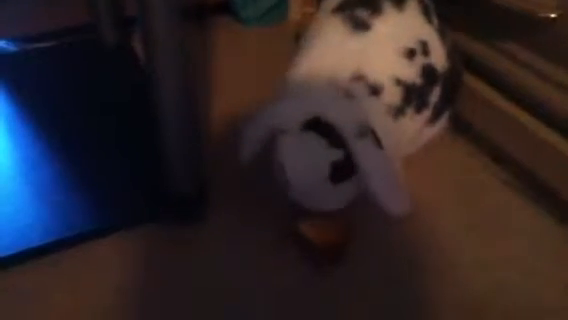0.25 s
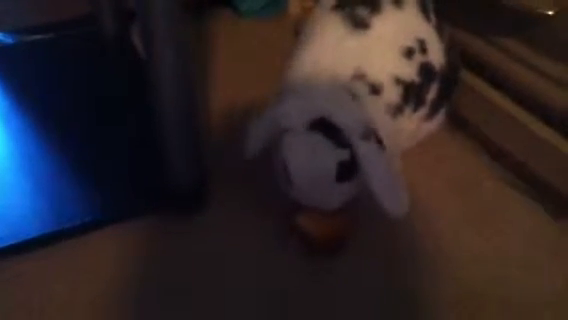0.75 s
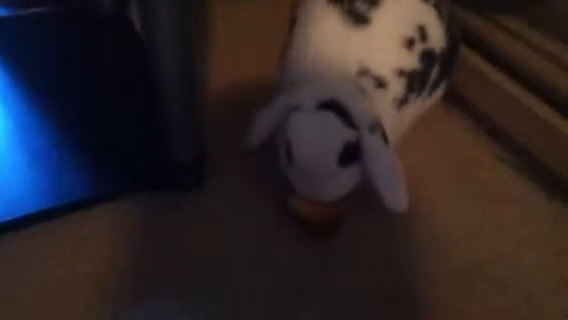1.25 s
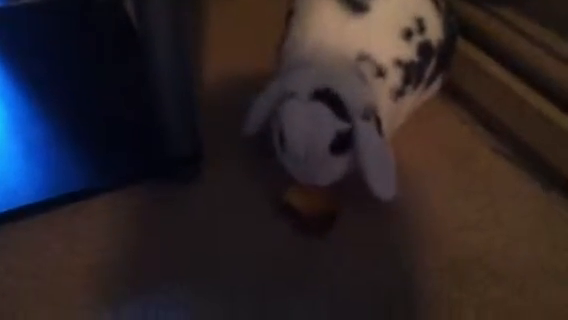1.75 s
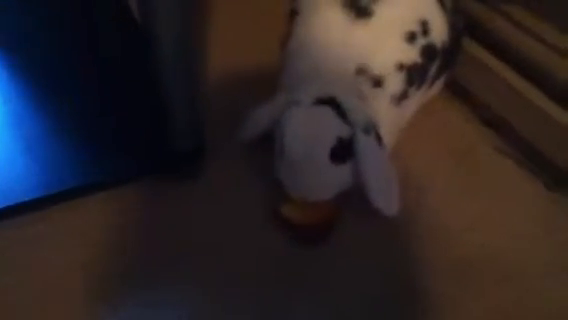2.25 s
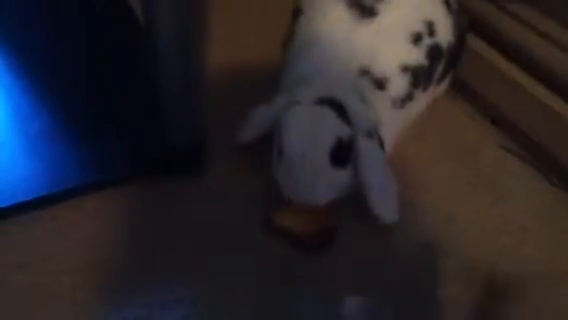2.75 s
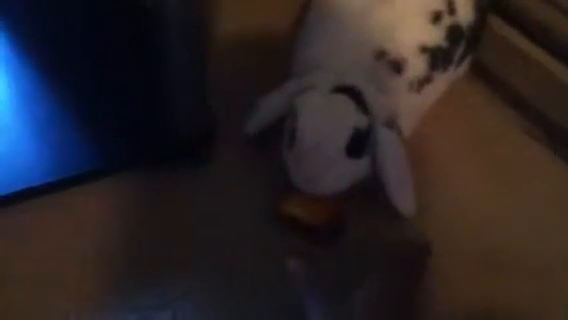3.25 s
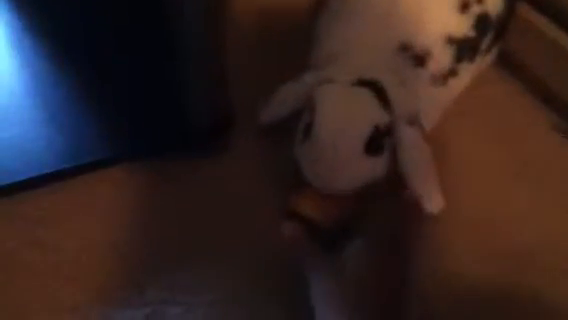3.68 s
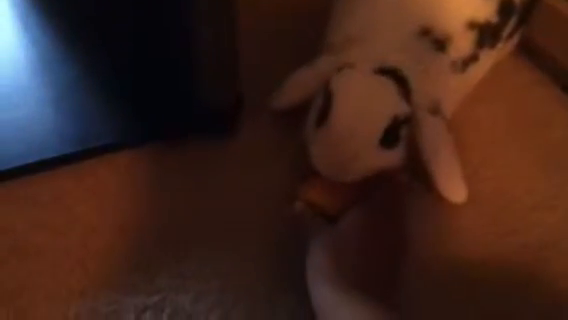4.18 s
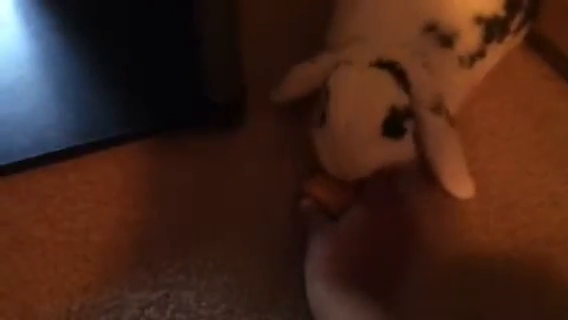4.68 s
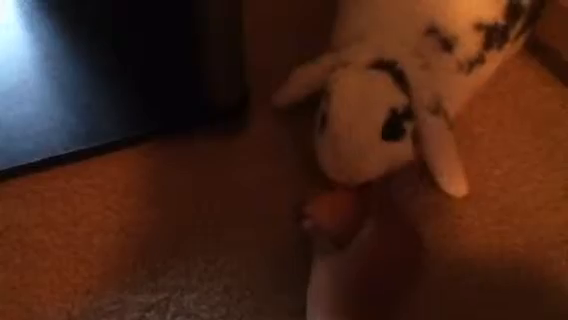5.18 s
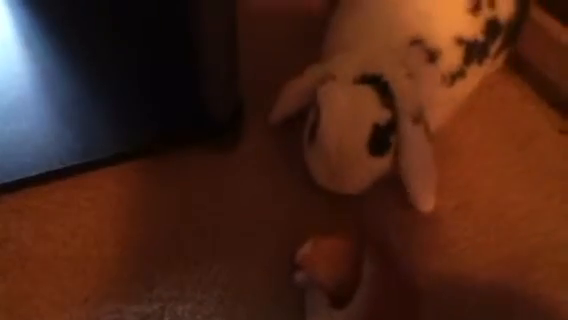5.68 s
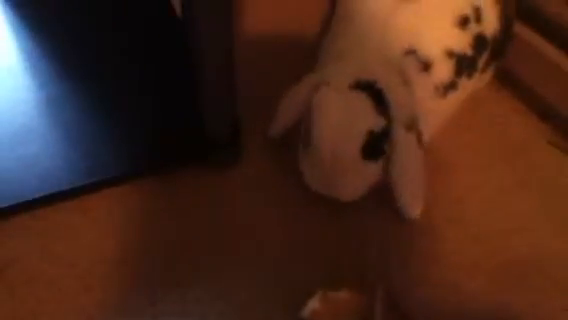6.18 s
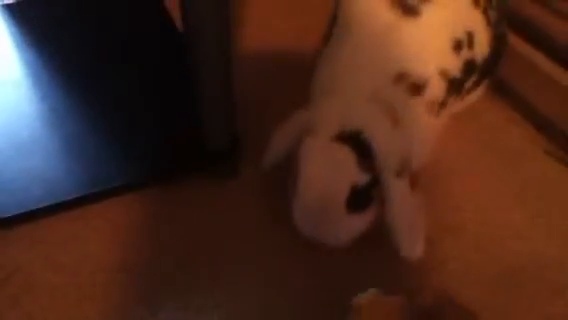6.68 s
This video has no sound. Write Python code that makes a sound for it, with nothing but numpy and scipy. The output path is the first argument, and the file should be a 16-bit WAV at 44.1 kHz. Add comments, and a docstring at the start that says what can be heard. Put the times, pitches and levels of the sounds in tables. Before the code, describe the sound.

A rabbit eats dry toast in a quiet carpeted room, close to a small microphone. At about 0.3 seconds there is a dull little knock and one soft sniff, followed by two faint chews. From 1.2 to 1.6 seconds the teeth knock on the toast and break through the crust in a first crisp crunch. After a short pause, gnawing resumes at 2.1 seconds and runs in quick, irregular clusters of brittle cracks and fine crumbling, loudest around 2.6 and 3.6 seconds. Slightly smaller bites continue until about 5 seconds, ending with a light knock. From 5.5 seconds to the end, near 7, there is only faint closed-mouth chewing with a few soft, dull taps. A low room rumble, a wavering appliance hum, microphone noise and a barely audible high electronic whine continue throughout, with a soft hiss that swells slightly after 5 seconds.

```python
"""On a carpet in a quiet room, a rabbit gnaws dry toast close to a small microphone.
Its incisors slip through the crust in short jerks: tiny cells crumble, single ones crack out loud,
and each brittle fracture is an impulse that rings the slice. Slice and teeth knock dully. The rabbit
sniffs once and chews faintly with a shut mouth, mostly after the gnawing. Underneath lie room rumble,
appliance hum, a soft hiss, microphone noise and a thin electronic whine."""
import sys
import numpy as np
from scipy import signal
from scipy.fft import rfft, irfft
from scipy.io import wavfile
from scipy.ndimage import uniform_filter1d

SR = 44100
rng = np.random.default_rng(int(sys.argv[2]) if len(sys.argv) > 2 else 0)


def generate_wav(sig):
    """Save sig (samples, or channels by samples) to the path in sys.argv[1] as 16-bit PCM at SR."""
    pcm = np.round(np.clip(np.atleast_2d(sig).T, -1, 1) * 32767).astype(np.int16)
    wavfile.write(sys.argv[1], SR, pcm)


N = 305613

# slips of the teeth through the crust: (time [s], length [s], crumbling level [dB], thick crumb [dB])
JERKS = [(1.189, .035, -58, 6), (1.384, .013, -50.5, 1), (1.408, .011, -44, 0), (1.439, .012, -39, 6),
         (1.472, .006, -37, 6), (1.505, .01, -52, -5), (1.522, .012, -62, -10), (1.568, .009, -63, 1),
         (2.101, .004, -62, 12), (2.128, .022, -56, 7), (2.321, .01, -49, 0), (2.339, .014, -40, -4),
         (2.373, .015, -44, -3), (2.508, .014, -56, 5), (2.53, .01, -34, -6), (2.549, .027, -43, 1),
         (2.587, .012, -42, 2), (2.62, .016, -40, 7), (2.655, .012, -41, 6), (2.684, .014, -40, 5),
         (2.712, .008, -55, 0), (2.727, .012, -52, 0), (2.747, .05, -60, 0), (2.814, .012, -48, 3),
         (2.83, .018, -45, -1), (2.868, .015, -48, -8), (2.912, .035, -60, -8), (3.034, .015, -55, 5),
         (3.054, .018, -49, 0), (3.086, .019, -55, -6), (3.12, .008, -53, 2), (3.161, .022, -65, -4),
         (3.222, .022, -68, -5), (3.269, .006, -54, 3), (3.277, .014, -42, 2), (3.312, .024, -43, -3),
         (3.48, .012, -66, 0), (3.517, .02, -44, 3), (3.541, .01, -39, -6), (3.556, .014, -41, -6),
         (3.579, .008, -33, 0), (3.597, .014, -44, 3), (3.633, .012, -42, -1), (3.732, .026, -51, -3),
         (3.771, .06, -66, 1), (3.851, .012, -46, -5), (3.866, .012, -34, -8), (3.884, .01, -31, -6),
         (3.905, .018, -38, 0), (3.942, .014, -41, 0), (3.979, .011, -45, 0), (4.027, .02, -55, -5),
         (4.055, .008, -56, 2), (4.08, .016, -57, 3), (4.124, .007, -50, 1), (4.138, .008, -42, 2),
         (4.166, .004, -52, 0), (4.175, .009, -41, -2), (4.2, .004, -42, 0), (4.209, .02, -60, -2),
         (4.415, .01, -43, 3), (4.432, .008, -36, -5), (4.441, .016, -55, -6), (4.466, .014, -47, -2),
         (4.484, .014, -50, -2), (4.562, .016, -62, 0), (4.602, .016, -44, 5), (4.627, .007, -38, -6),
         (4.653, .014, -48, 4), (4.685, .048, -62, 5), (4.742, .023, -55, -5), (4.827, .016, -43, 2),
         (4.852, .005, -34, -6), (4.868, .008, -42, -3), (4.903, .006, -52, -2), (4.912, .006, -42, -5),
         (4.925, .008, -56, -3), (4.949, .013, -37, -9), (4.979, .016, -36, -7), (5.003, .014, -48, 0),
         (5.024, .055, -57, -6)]
LEAD = 128  # samples by which each band's response starts ahead of the break


def amp(db):
    """Amplitude ratio of a level in decibels."""
    return 10 ** (np.asarray(db) / 20)


def unit_rms(x):
    """Normalisation to unit mean power."""
    return x / np.sqrt(np.mean(x ** 2) + 1e-20)


def spectrum_at(points, hz):
    """Interpolation of a spectrum on a log-frequency axis."""
    f, db = np.transpose(points)
    return np.interp(np.log(hz + 1), np.log(f + 1), db)


def add(mix, s, sound):
    """Superposition: a sound joins the mix at s seconds."""
    part = mix[..., round(s * SR):][..., :sound.shape[-1]]
    part += sound[..., :part.shape[-1]]


def minimum_phase(gain_db):
    """Minimum phase: the most compact causal response with these gains, given from 0 Hz to SR / 2."""
    log_gain = np.log(amp(np.maximum(gain_db, -100)))
    mirrored = np.r_[log_gain, log_gain[-2:0:-1]]
    return np.fft.ifft(np.exp(np.conj(signal.hilbert(mirrored)))).real[:1024]


def resonate(x, hz, width_hz):
    """Resonance by heterodyning: shift hz down to zero, smooth, and shift back."""
    carrier = np.exp(2j * np.pi * np.cumsum(hz * np.ones(len(x))) / SR)
    pole = np.exp(-np.pi * width_hz / SR)
    return 2 * (carrier * signal.lfilter([1 - pole], [1, -pole], x / carrier)).real


def shaped_noise(spectrum, patchy_db):
    """Spectral shaping of Gaussian noise, whose level drifts in patches of time and frequency."""
    frames, hz = N // 256 + 5, np.fft.rfftfreq(1024, 1 / SR)
    real, imag, patches = rng.standard_normal((frames, 513, 3)).T
    patches = uniform_filter1d(patches, size=10, axis=0)
    patches = unit_rms(uniform_filter1d(patches, size=12, axis=1))
    spectra = (real + 1j * imag) * amp(spectrum_at(spectrum, hz)[:, None] + patchy_db * patches)
    return unit_rms(signal.istft(spectra, nperseg=1024, noverlap=768)[1][:N])


def room_noise(level_db=-56):
    """Broadband noise floor: room rumble in the bass, microphone noise above it."""
    # noise spectrum: (frequency [Hz], relative density [dB])
    floor = [(12, -58), (20, -16), (69, -14.5), (108, -0.5), (224, -3.5), (258, -6.5), (332, -8.5),
             (634, -10.5), (1140, -19), (1350, -21), (1650, -24.5), (2120, -28), (2730, -25),
             (15200, -29.5), (16500, -48)]
    return amp(level_db) * shaped_noise(floor, patchy_db=1.07)


def appliances(whine_hz=14994, whine_db=-83):
    """Narrow-band noise is heard as a wavering hum; a pure tone is the steady electronic whine."""
    # hum bands: (frequency [Hz], level [dB], bandwidth [Hz])
    bands = [(120.3, -62.5, 11), (221.4, -64, 15.6)]
    hum = sum(amp(db) * unit_rms(resonate(rng.standard_normal(N), hz, width)) for hz, db, width in bands)
    return hum + amp(whine_db) * np.sqrt(2) * np.sin(2 * np.pi * whine_hz * np.arange(N) / SR)


def hiss():
    """Slow amplitude modulation makes a soft noise swell and fade."""
    # hiss spectrum: (frequency [Hz], relative density [dB])
    spectrum = [(450, -18), (800, -2.5), (1300, -2), (1900, 1), (2600, -4), (3500, -11), (6000, -15),
                (10000, -14), (14000, -45)]
    # envelope: (time [s], level [dB])
    swell = [(0, -70), (2.2, -68.5), (3.5, -66.5), (5, -68.5), (5.2, -62), (5.5, -63.5), (5.9, -62),
             (6.3, -64), (6.7, -62.5), (6.93, -66.5)]
    level_db = np.interp(np.arange(N) / SR, *np.transpose(swell))
    return amp(level_db) * shaped_noise(spectrum, patchy_db=2.0)


def knocks(contact_hz=2300):
    """Impacts of slice and teeth excite damped modes; the soft contact acts as a low-pass filter."""
    # impacts: (time [s], level [dB], pitch [Hz])
    impacts = [(.282, -41, 310), (.288, -35.5, 313), (1.191, -39.5, 705), (1.349, -36, 720),
               (1.388, -38, 620), (4.952, -28, 1700), (4.955, -38, 1680), (5.555, -43, 1210),
               (5.768, -39, 840), (5.773, -41, 872), (6.007, -43, 800), (6.255, -42.5, 750)]
    # modes: (frequency [multiple of pitch], relative level [dB], 60 dB decay [cycles])
    modes = [(1, -3, 13.5), (1.9, -16, 0.5), (3.4, -4, 8.5), (5.8, -3, 28)]
    out, t = np.zeros(N), np.arange(3000) / SR
    for s, db, hz in impacts:
        for multiple, mode_db, decay_cycles in modes:
            cycles = multiple * hz * t
            ring = amp(db + mode_db - 60 * cycles / decay_cycles) * np.sin(2 * np.pi * cycles)
            add(out, s, ring / (1 + (multiple * hz / contact_hz) ** 6))
    return out


def sniff():
    """Air noise in a narrow nostril passes a gliding resonance and becomes a fuzzy whistle."""
    # course of the sniff: (time [s], level [dB], whistle [Hz])
    breath = [(.295, -70, 1850), (.32, -56, 1870), (.35, -59, 1990), (.39, -65, 1830), (.43, -72, 1800)]
    s, db, hz = np.transpose(breath)
    t, out = np.arange(s[0], s[-1], 1 / SR), np.zeros(N)
    air = resonate(rng.standard_normal(len(t)), np.interp(t, s, hz), width_hz=220)
    add(out, s[0], amp(np.interp(t, s, db)) * unit_rms(air))
    return out


def toast_responses():
    """Impulse response of the slice in four bands, low to high: thick crumb, body, crust, thin flakes."""
    # colour of breaking toast: (frequency [Hz], relative density [dB])
    spectrum = [(120, -29), (220, -4.5), (500, -15.5), (720, -1), (950, -2), (1350, -0.5), (1880, 0.5),
                (2400, 0.5), (2960, -3.5), (3800, 0), (4500, -2.5), (5000, -1), (5500, -4), (6430, 1.5),
                (7700, -13), (10000, -9.5), (12100, -16), (15600, -27.5), (16500, -48)]
    # borders between the bands: (frequency [Hz])
    crossovers = [1400, 3000, 7500]
    hz = np.fft.rfftfreq(4096, 1 / SR)
    lowpasses = [1 / (1 + (hz / edge) ** 6) for edge in crossovers]
    bands = np.diff(lowpasses, axis=0, prepend=0, append=1)
    whole = rfft(minimum_phase(spectrum_at(spectrum, hz)), 4096)
    responses = np.roll(irfft(whole * bands), LEAD, axis=1)[:, :1024]
    return responses / np.linalg.norm(responses.sum(0))


def toast(force):
    """Convolution: each row of the force rings its own band of the slice."""
    return signal.oaconvolve(force, toast_responses(), axes=1)[:, LEAD:N + LEAD].sum(0)


def crumbling(strokes, rise_db_s, fall_db_s, cells_per_s, spread_db):
    """Shot noise: tiny cells give way at random while the teeth slip. One row of force for each band."""
    envelope = np.zeros((4, N))
    for s, length, db, thick_db, crust_db, thin_db in strokes:
        t = np.arange(-.02, length + .04, 1 / SR)
        slope_db = rise_db_s * np.minimum(t, 0) - fall_db_s * np.maximum(t - length, 0)
        add(envelope, s - .02, amp(db + slope_db + np.c_[[thick_db, 0, crust_db, thin_db]]))
    size = amp(spread_db * np.minimum(rng.exponential(1, N), 4)) * rng.choice([-1., 1.], N)
    breaks = rng.random(N) < cells_per_s / SR
    return envelope * unit_rms(size * breaks)


def chewing(thick_db=4, crust_db=-5, thin_db=1.5):
    """Faint shot-noise force of shut-mouth grinding; brightness trades thick crumb for thin flakes."""
    # grinding strokes: (time [s], length [s], level [dB], brightness [dB])
    chews = [(.52, .012, -62, -3), (.72, .033, -62, -6), (5.554, .005, -55, -3), (5.647, .003, -60, 9),
             (5.731, .004, -62, 2), (5.767, .01, -54, 1), (5.79, .009, -58, -6), (5.807, .006, -59, 9),
             (5.835, .008, -60, 9), (6.006, .012, -52, -2), (6.03, .025, -63, -4), (6.24, .06, -63, -8),
             (6.46, .012, -60, -3), (6.48, .012, -62, -3), (6.673, .014, -56, -4), (6.71, .041, -59, -8),
             (6.86, .006, -64, 9), (6.9, .017, -56, 0)]
    strokes = [(s, length, db, thick_db - bright_db, crust_db, thin_db + bright_db)
               for s, length, db, bright_db in chews]
    return crumbling(strokes, rise_db_s=5002, fall_db_s=1500, cells_per_s=9700, spread_db=4.5)


def coloured_jerks():
    """Spectral weighting: each jerk takes the crust and flake gains of the piece between the teeth."""
    # bites, each holding until the next: (time [s], crust [dB], thin flakes [dB])
    bites = [(1.18, 2, 0), (1.38, 3, 4), (2.09, 4, 9), (2.31, -2, 0), (2.5, 3, -2), (2.61, 4, 3),
             (2.81, 2, -1), (3.03, 3, -3), (3.26, 3, 2), (3.47, 4, 0), (3.535, -1, -11), (3.59, 3, -1),
             (3.72, -3, 0), (3.85, -3, -4), (4.11, -4, 2), (4.41, -5, -3), (4.6, -7, -4), (4.64, 1, -2),
             (4.82, -8.5, -6), (4.94, -8, -4), (5.0, 1, 8)]
    jerks, bites = np.array(JERKS), np.array(bites)
    current = np.searchsorted(bites[:, 0], jerks[:, 0] + .01) - 1
    return np.c_[jerks, bites[current, 1:]]


def gnawing():
    """Stick-slip motion: each jerk of the incisors releases a burst of crumbling force."""
    return crumbling(coloured_jerks(), rise_db_s=3800, fall_db_s=2200, cells_per_s=7400, spread_db=5.5)


def small_cracks(per_jerk=2, above_crumbling_db=14, spread_db=3):
    """Random fracture: lesser cracks fall by chance within each jerk, as (time [s], energy [dB])."""
    s, length, db, _ = np.transpose(JERKS)[..., None]
    position, size = rng.random((len(JERKS), per_jerk, 2)).transpose(2, 0, 1)
    times = s + position ** 1.5 * length
    energy_db = db + above_crumbling_db - spread_db * np.log(.1 + size)
    return list(zip(times.ravel(), energy_db.ravel()))


def cracking(dulling=0.18, pivot_db=0.5, depth_spread_db=2.5):
    """Brittle fracture of single cells: a force impulse, then splinters dying within milliseconds."""
    # the loudest cracks: (time [s], released energy [dB])
    loud_cracks = [(1.2047, -26), (1.3501, -30), (1.4078, -13), (1.4123, -10), (1.418, -11.5), (1.439, -9),
                   (1.4434, -4.5), (1.4502, -11), (1.47, -16), (1.4748, -6), (1.4857, -19), (1.5067, -24),
                   (1.5214, -21.5), (2.139, -23), (2.3242, -17), (2.341, -13.5), (2.3487, -15),
                   (2.3746, -13.5), (2.382, -15.5), (2.5221, -17), (2.5308, -5), (2.5379, -7),
                   (2.5576, -11), (2.5487, -18), (2.5673, -4), (2.5762, -19), (2.5872, -7), (2.5925, -5),
                   (2.5969, -6), (2.6198, -3), (2.6236, -4), (2.628, -8.5), (2.6319, -9.5), (2.6359, -18),
                   (2.655, -16), (2.658, -10.5), (2.6619, -3), (2.6672, -16), (2.6833, -14.5),
                   (2.6894, 1.5), (2.6953, -8), (2.8389, -5), (2.876, -19.5), (2.9432, -27), (3.034, -22.5),
                   (3.054, -23), (3.0664, -16), (3.1261, -27), (3.2772, -16), (3.28, -10.5), (3.285, -13.5),
                   (3.288, -6.5), (3.3161, -9.5), (3.3202, -9), (3.3275, -14), (3.5167, -11), (3.5205, -10),
                   (3.5234, -14), (3.541, -7), (3.549, -5.5), (3.5542, 4.5), (3.5584, -5), (3.563, -3.5),
                   (3.5692, -13), (3.5792, -2), (3.5817, -5), (3.586, -10), (3.599, -10), (3.6098, -8),
                   (3.6341, -12), (3.6432, -11.5), (3.7388, -24.5), (3.87, -12.5), (3.873, -12),
                   (3.8766, -10), (3.888, -12), (3.8933, -14), (3.9049, -10), (3.9112, -14), (3.9219, -5.5),
                   (3.9519, -13), (3.9834, -22), (3.9879, -23), (4.0918, -28.5), (4.126, -19), (4.141, -13),
                   (4.1671, -11), (4.176, -12), (4.2, -7), (4.4145, -17), (4.4185, -14), (4.433, -7.5),
                   (4.4392, -11), (4.478, -22), (4.4873, -19.5), (4.6149, -19), (4.6275, -16), (4.66, -10),
                   (4.8418, -18), (4.8518, -6), (4.868, -9), (4.906, -17), (4.8574, -21), (4.9155, -10),
                   (4.9249, -19), (4.9517, -18.5), (4.956, -12), (4.9785, -18.5), (4.9811, -7),
                   (4.9853, -7.5), (4.9896, -8), (4.998, -17), (5.066, -24)]
    force, t = np.zeros((4, N)), np.arange(600) / SR
    starts, _, _, thick, crust, thin = coloured_jerks().T
    responses = toast_responses()
    band_overlap = responses @ responses.T
    splinter_db = np.c_[[-18, -14, -13, -8]]  # thin flakes rattle most
    t60_s = np.c_[[.012, .0075, .007, .009]]
    cracks = loud_cracks + small_cracks()
    for (s, db), splinters in zip(cracks, rng.standard_normal((len(cracks), len(t)))):
        burst = splinters * amp(splinter_db - 60 * t / t60_s)
        burst[:, 0] = np.sign(splinters[0])  # the break itself
        burst /= np.linalg.norm(burst, axis=1)[:, None]
        jerk = max(np.searchsorted(starts, s + .003) - 1, 0)  # the piece under the tooth sets the colour
        thick_db = thick[jerk] + depth_spread_db * splinters[-1]  # more or less deep into the crumb
        thin_db = thin[jerk] - dulling * (db - pivot_db)  # large cells are duller
        colour = amp([thick_db, 0, crust[jerk], thin_db])
        colour /= np.sqrt(colour @ band_overlap @ colour)  # the colour leaves the energy alone
        add(force, s, amp(db) * colour[:, None] * burst)
    return force


def scene():
    """Linear superposition of the rabbit and the room in one channel."""
    force = gnawing() + cracking() + chewing()
    return (toast(force) + knocks() + sniff() + appliances() + room_noise() + hiss())[None]


def record(dry):
    """Band limiting: a linear-phase low-pass filter cuts off at 16.3 kHz."""
    lowpass = signal.firwin(511, 16300, window=("kaiser", 9), fs=SR)
    return signal.oaconvolve(dry, lowpass[None], "same")


dry = scene()
out = record(dry)
generate_wav(out)
```